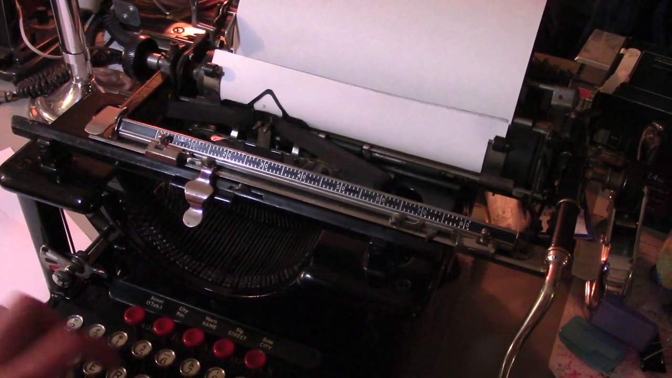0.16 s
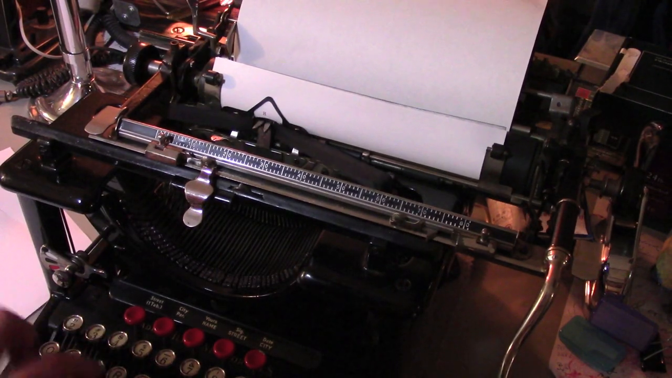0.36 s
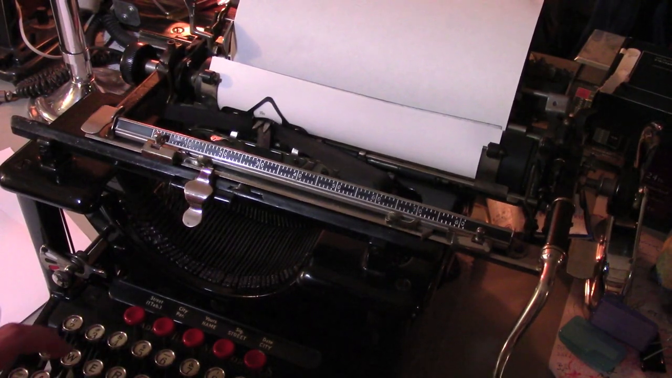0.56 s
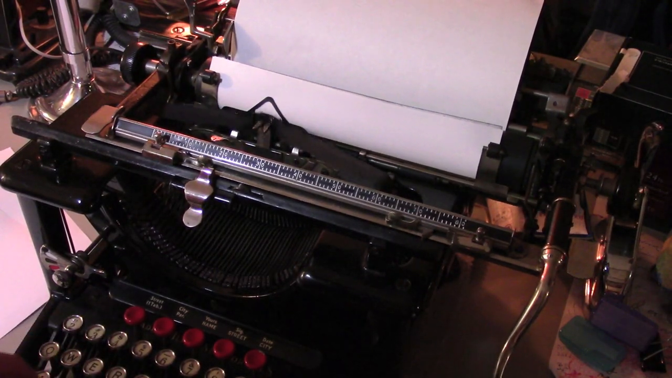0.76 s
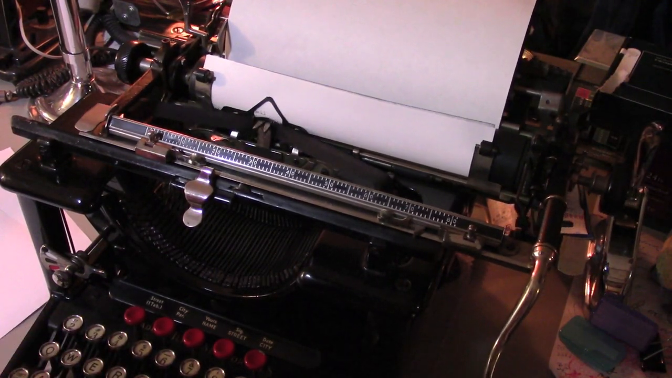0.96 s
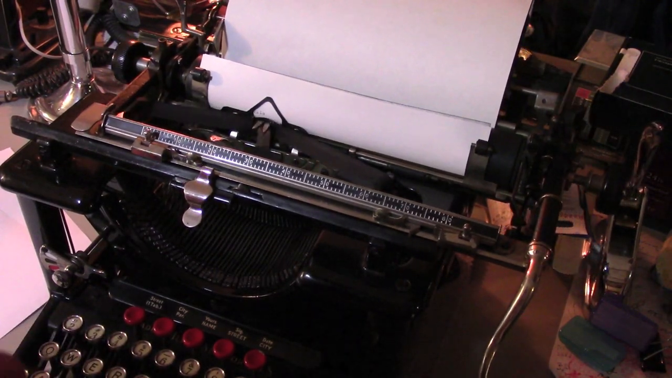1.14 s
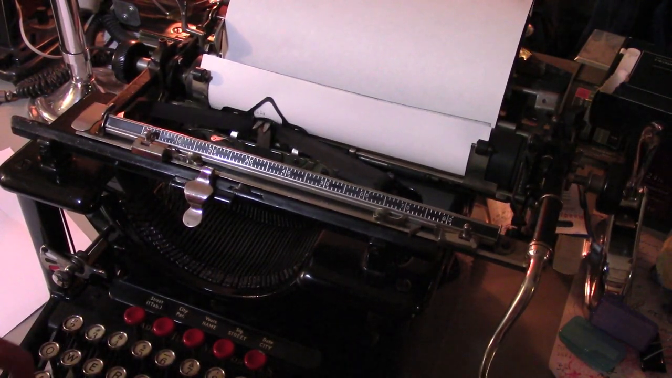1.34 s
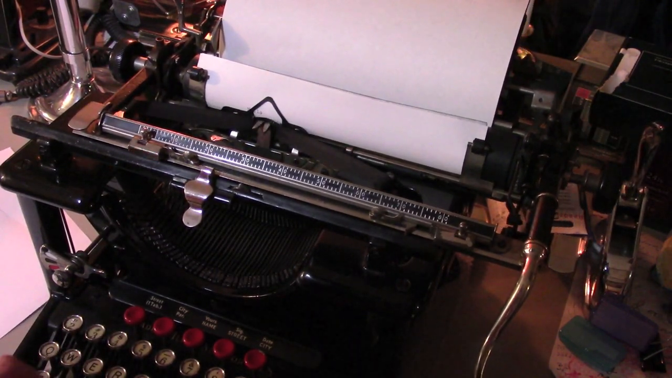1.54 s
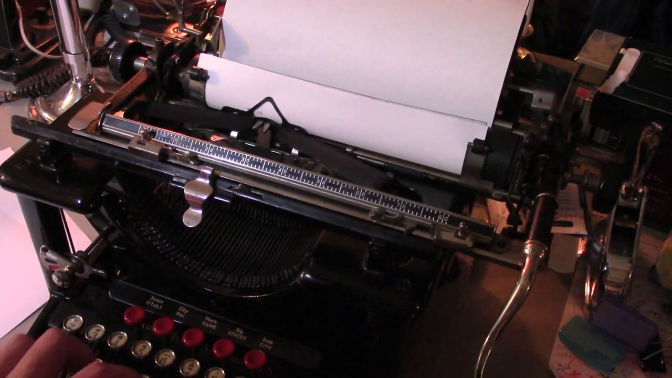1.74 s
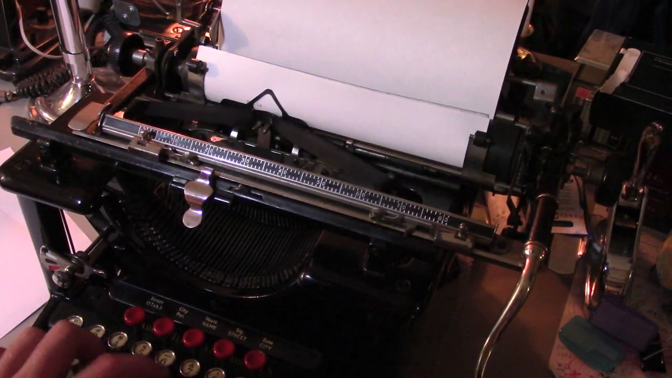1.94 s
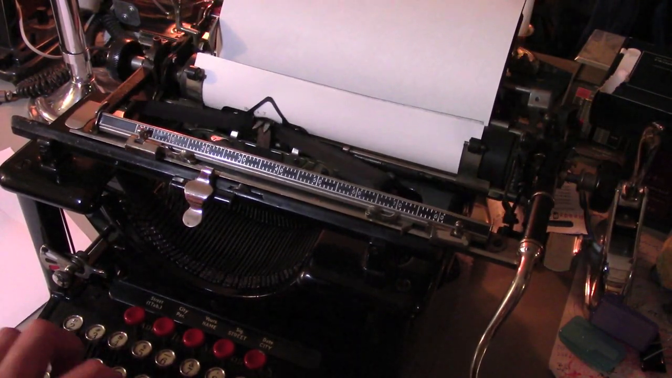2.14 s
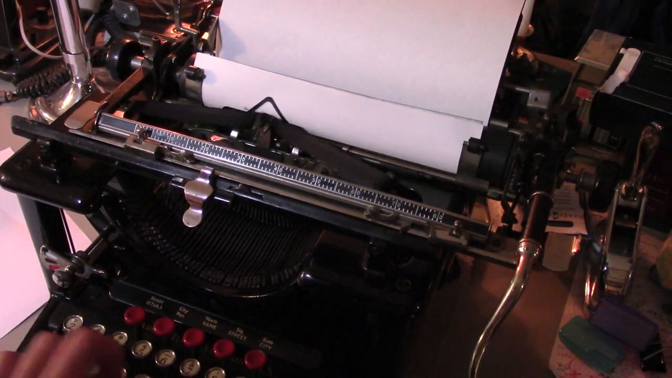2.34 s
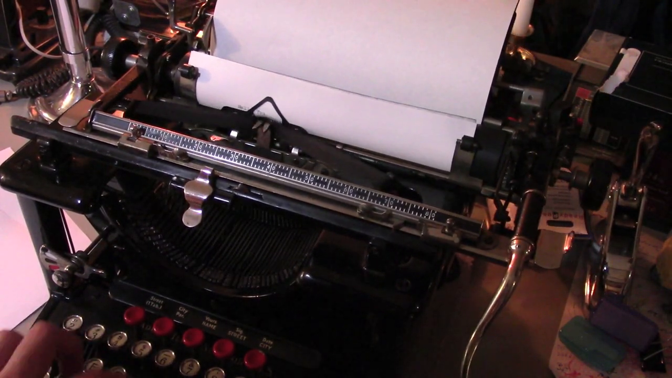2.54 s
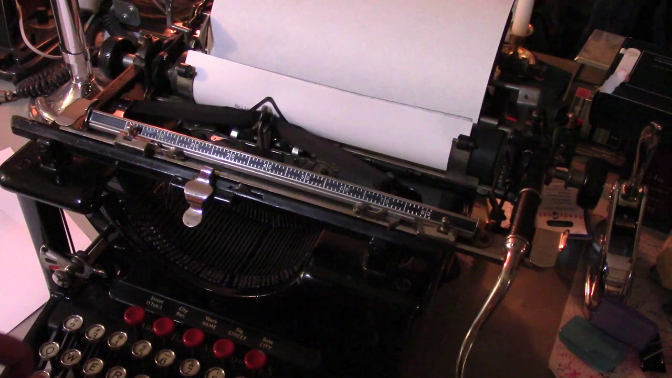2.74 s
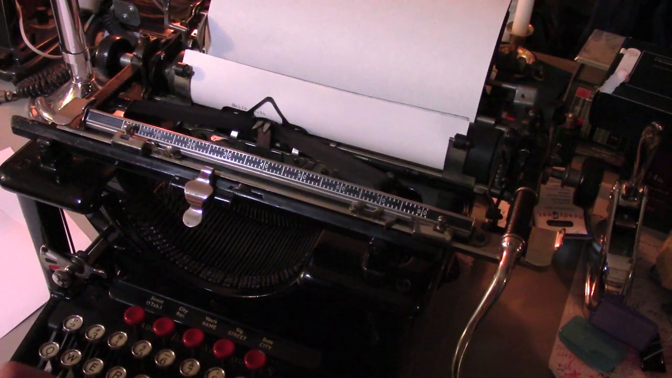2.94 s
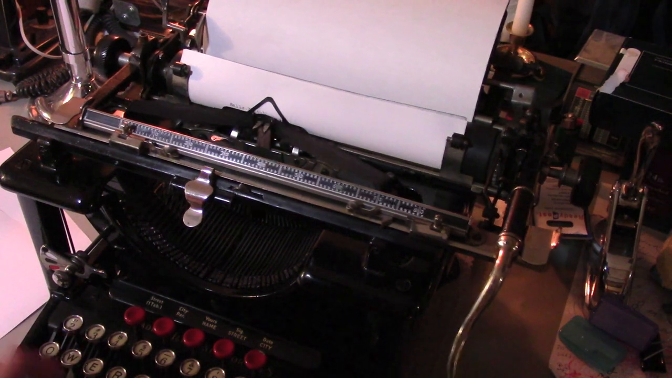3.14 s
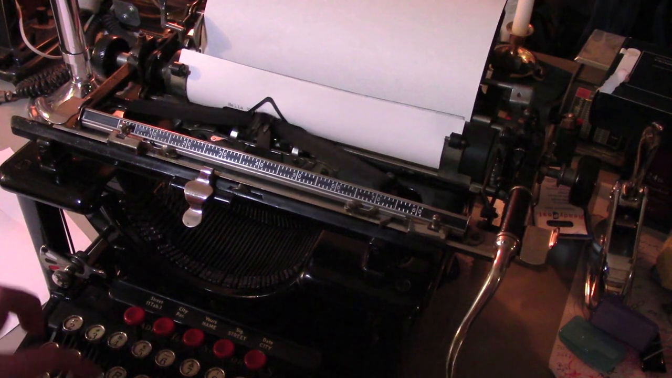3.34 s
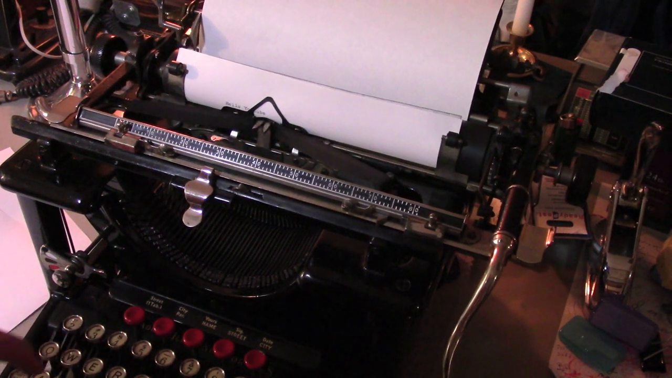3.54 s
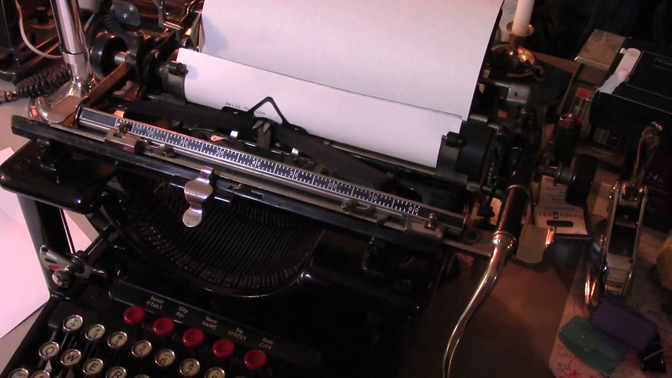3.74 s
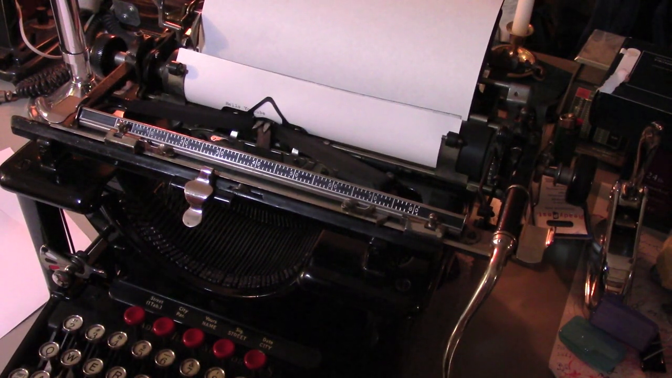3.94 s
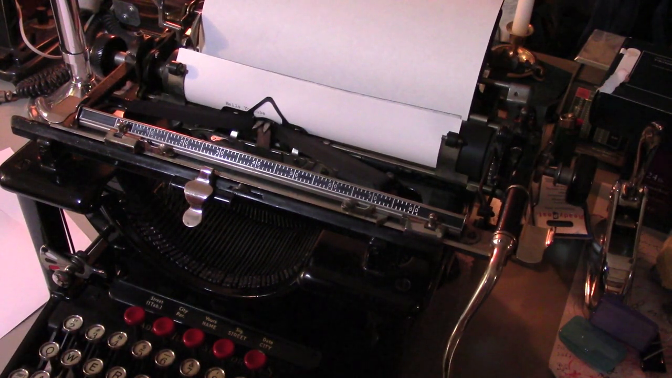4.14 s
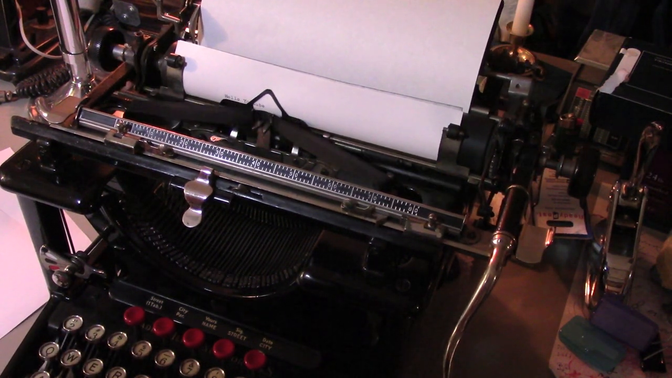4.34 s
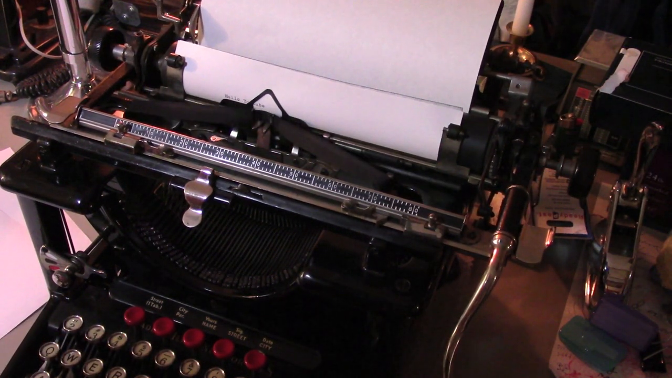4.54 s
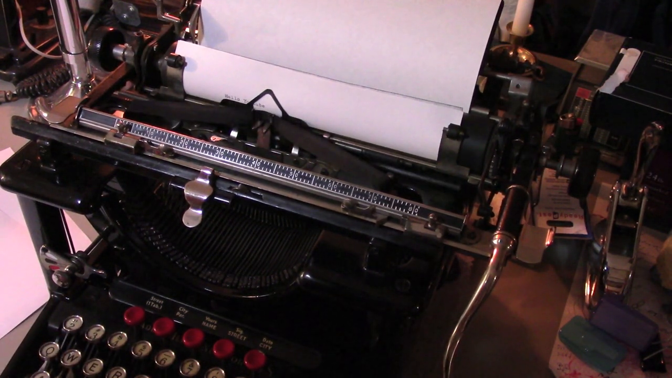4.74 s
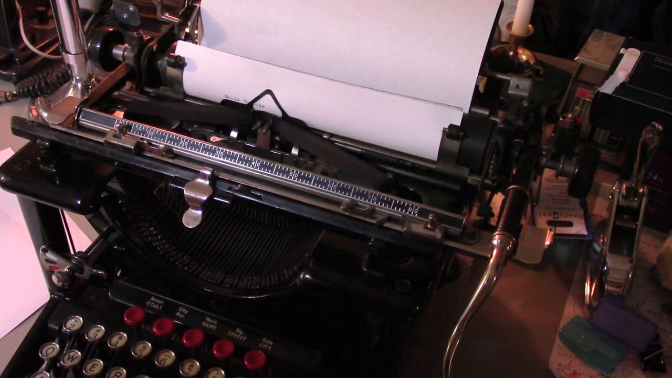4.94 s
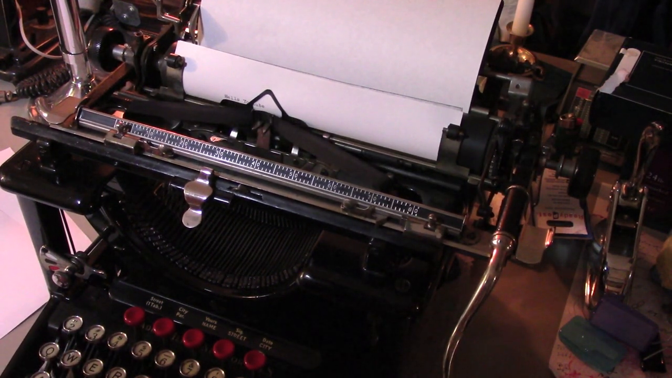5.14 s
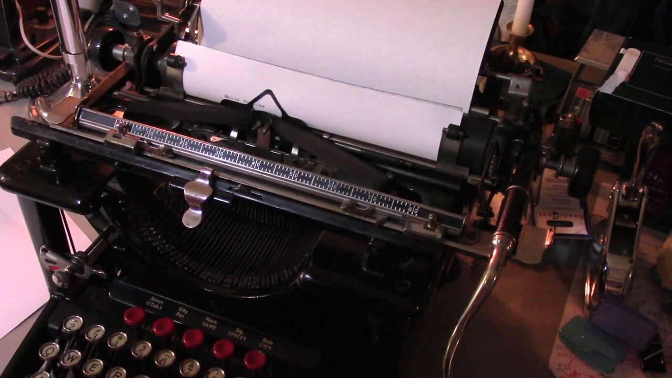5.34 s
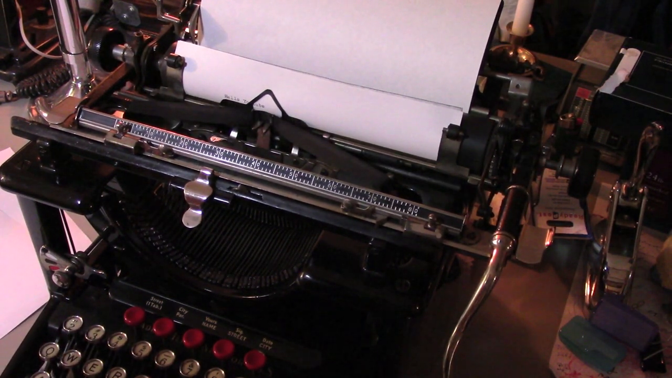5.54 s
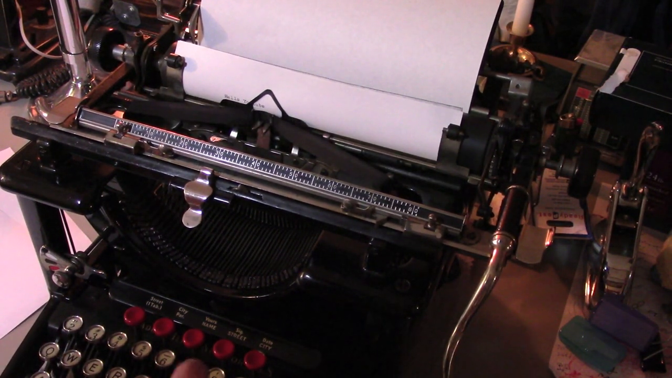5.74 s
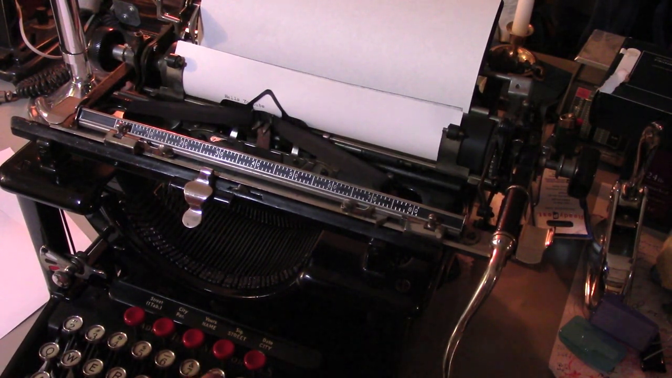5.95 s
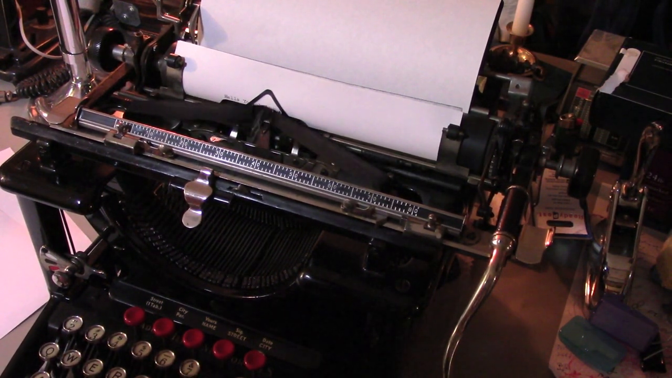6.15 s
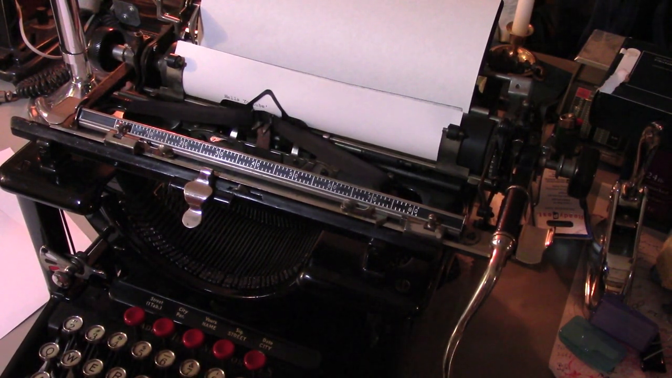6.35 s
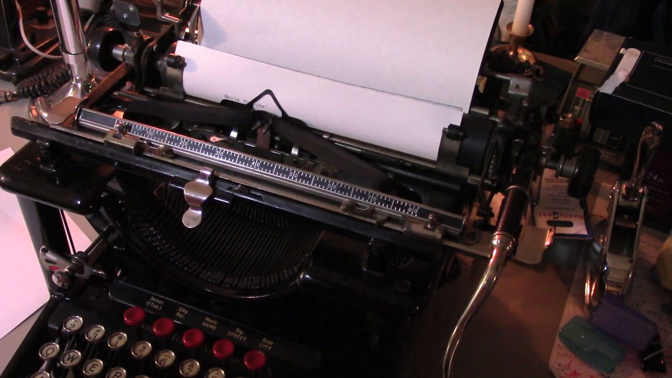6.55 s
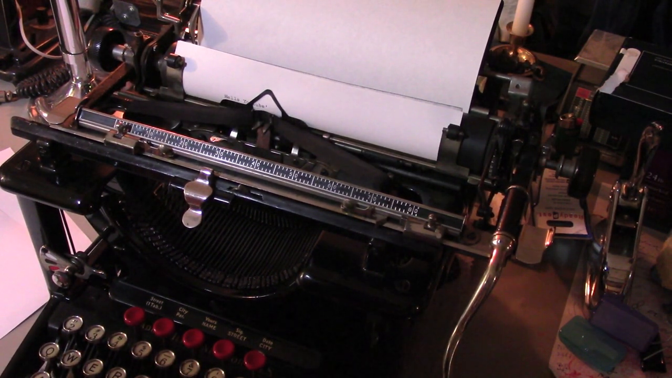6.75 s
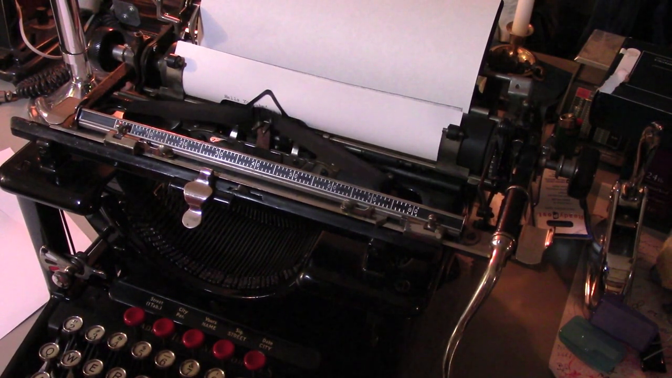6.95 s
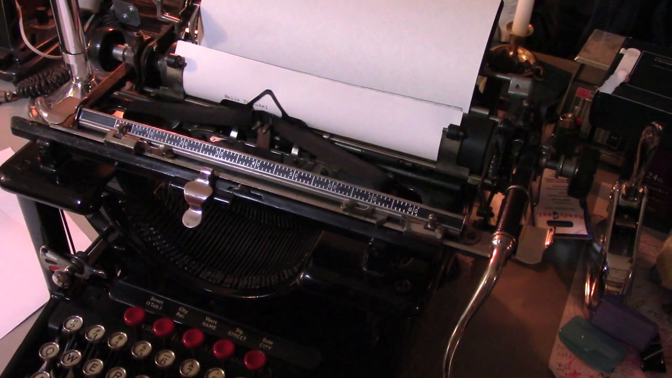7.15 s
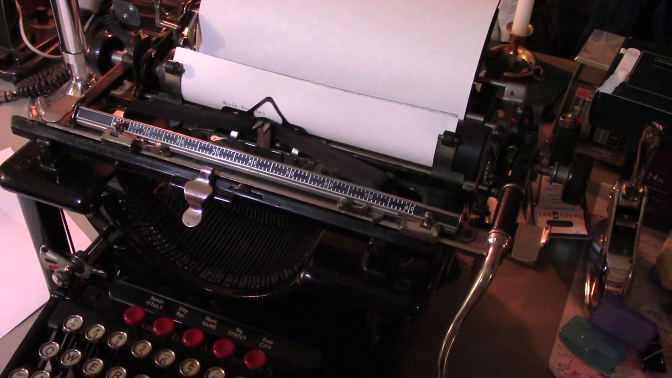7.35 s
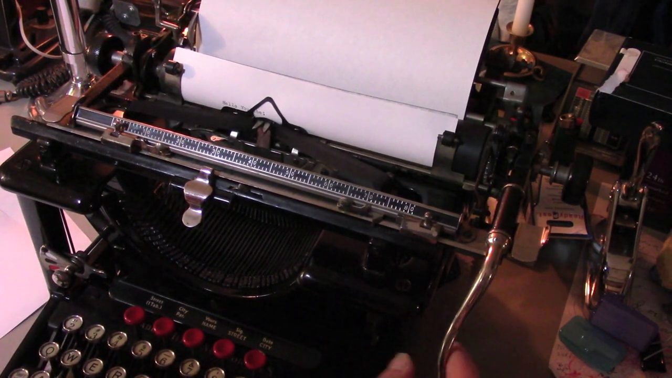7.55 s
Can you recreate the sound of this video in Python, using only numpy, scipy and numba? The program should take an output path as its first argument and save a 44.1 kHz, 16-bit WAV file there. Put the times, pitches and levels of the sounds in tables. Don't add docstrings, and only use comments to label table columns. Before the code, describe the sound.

Close by, a heavy manual typewriter is typed on in a quiet furnished room. Sharp, bright strikes on the platen come in uneven runs for about three and a half seconds, each followed by small clattering key and carriage clicks. Duller space-bar or shift thuds shake the wooden desk. A long pause follows, broken by a heavy thud, then two lone strikes and a final thud over low room rumble and faint hiss.

```python
import sys
import numpy as np
from scipy import signal
from scipy.fft import rfft, irfft
from scipy.io import wavfile
from scipy.ndimage import uniform_filter1d
from numba import njit

SR = 44100
rng = np.random.default_rng(int(sys.argv[2]) if len(sys.argv) > 2 else 0)


def inscribe(sig):
    pcm = np.round(np.clip(np.atleast_2d(sig).T, -1, 1) * 32767)
    wavfile.write(sys.argv[1], SR, pcm.astype(np.int16))


def to_linear_factor(level_db):
    exponent = np.asarray(level_db, float) / 20
    return 10 ** exponent


N = 334719
SPAN = 14000

# pitch_hz, level_db (per Hz)
AIR_SPECTRUM = [(15, -1.5), (124, -14.5), (162, -21), (205, -12), (480, -20), (740, -27), (1650, -38.5),
                (14100, -50.5)]
AIR_DB, AIR_LOW_HZ = -49.5, 11
MURMUR_HZ, MURMUR_WIDTH_HZ, MURMUR_DB = 1228, 130, 5.5

# pitch_hz, width_hz, level_db
STRIKE_BARS = [(2270, 87, 2), (2430, 210, -6.5), (2913, 100, 4.5), (3230, 56, -10.5), (3812, 240, -2),
               (4130, 40, -9), (4940, 37, -10.5), (4948, 42, -5), (5665, 60, -4.5), (6045, 51, -4.5),
               (6646, 200, -1)]
THUD_BARS = [(1810, 210, -7), (2280, 63, -9.5), (2900, 380, 4), (3150, 77, 0.5), (3800, 150, -1.5),
             (4193, 71, -33), (4584, 45, -4.5), (4640, 31, 2.5), (5800, 110, -13.5)]
LINK_BARS = [(1666, 93, 3.5), (2500, 380, -1.5), (3030, 70, 8), (3350, 130, 6.5), (4910, 48, -7),
             (5580, 38, -22.5), (6200, 32, -18), (7000, 96, -18.5)]
FRAME_MODES = [(287, 24, -2), (348, 6.3, -17.5), (421, 28, -1), (509, 50, 5.5), (704.5, 92, -6.5),
               (948, 77, -7.5), (1159, 270, -1.5), (1310, 37, -16)]
DESK_MODES = [(39.4, 22, -10), (72, 5.5, -11), (102, 5.2, -7.5), (121, 6.7, 9), (163.8, 17, 3),
              (211, 69, 4)]

# lever_start_s, lever_db, ribbon_lead_ms (before the strike), ribbon_db
PRESSES = [(0.0055, -31.5, 8.5, -18.5), (0.3802, -27.5, 9.6, -22.5), (0.7383, -30.5, 11.2, -21),
           (0.8418, -28.5, 10.9, -23.5), (1.007, -33.5, 8.6, -18.5), (1.9953, -27, 9.5, -23),
           (2.275, -29.5, 11.1, -24), (2.3754, -26, 11.5, -22), (2.5432, -28.5, 10.1, -24),
           (2.7061, -29, 9.7, -22), (3.058, -28, 9.2, -24), (3.28, -26, 8.2, -22.5), (6.0628, -35, 12, -27),
           (6.9337, -36.5, 8.3, -25)]
# start_s, ring_db, frame_db (re ring), slap_pitch_hz, rattle_t60_s
STRIKES = [(0.0481, -8.5, -20, 3970, 0.21), (0.4194, -10.5, -18, 4200, 0.17),
           (0.7845, -10, -15, 3800, 0.16), (0.8894, -9, -17.5, 3800, 0.14), (1.049, -6.5, -19, 3670, 0.15),
           (2.0356, -7.5, -19.5, 3860, 0.17), (2.3193, -9, -18, 3230, 0.15),
           (2.4181, -9.5, -16, 4030, 0.23), (2.5838, -8.5, -21, 3520, 0.15),
           (2.7465, -8.5, -19, 3800, 0.18), (3.098, -7, -21.5, 4270, 0.18), (3.3142, -6.5, -23, 3870, 0.17),
           (6.118, -9.5, -21.5, 3140, 0.16), (6.9745, -7, -21.5, 3360, 0.15)]
STRIKE_FIZZ_DB = -13
# delay_ms, level_db
SLUG_BOUNCES = [(1.9, -1), (3.5, -5), (5.6, -11)]
# bar_lands_s, release_db, pawl_db, carriage_step_db, landing_db (-90: the carriage stays)
RETURNS = [(0.168, -33, -30, -30.5, -23.5), (0.5329, -30, -37.5, -28, -29),
           (0.9719, -36.5, -27, -32.5, -27), (1.1595, -30.5, -30, -32.5, -26),
           (1.458, -42, -33, -29, -33.5), (2.165, -32.5, -30.5, -29, -21.5),
           (2.5197, -30, -33, -26.5, -45.5), (2.6928, -29, -33, -28.5, -24),
           (2.8508, -37.5, -31.5, -28.5, -27.5), (3.207, -33, -31, -31, -24.5),
           (3.429, -31.5, -31, -32, -26), (6.234, -35.5, -90, -90, -23.5), (7.0991, -35, -93, -87, -27)]
RELEASE_LEAD_S, PAWL_LEAD_S, STEP_LEAD_S = .0435, .033, .021
# start_s, ring_db, frame_db (re ring), rattle_t60_s
SLACK = [(0.118, -38.5, -11, 0.065), (0.541, -27.5, -5.5, 0.025), (0.8296, -29, -1.3, 0.22),
         (1.3434, -47, 10, 0.11), (1.3527, -41, -7, 0.29), (2.3917, -30, -6, 0.25),
         (4.8382, -32.5, 1.5, 0.042), (4.8631, -40, -21.5, 0.16), (6.2274, -38, 5, .08),
         (7.0911, -45.5, 2, .08), (7.244, -43.5, 7.5, 0.11), (7.2575, -31, 2, 0.19)]
SLACK_FIZZ_DB, SLACK_RISE_MS = -9, 6.9
# start_s, ring_db, frame_db (re ring)
TICKS = [(0.333, -55, 8), (0.602, -46, -8), (2.2191, -51, -8.5), (2.2487, -39, -3), (2.9263, -49.5, 5),
         (3.4938, -50, -13), (4.401, -61.5, 6), (4.8106, -59.5, -9), (5.2861, -55.5, -3), (5.4286, -60, -1),
         (5.5643, -55.5, -25), (5.944, -66, -3), (6.296, -51.5, -5), (7.2178, -55, 3), (7.2316, -52.5, 1.1),
         (7.3583, -51, 1.5)]
TICK_FIZZ_DB, TICK_RISE_MS, TICK_T60_S = -7, 1.8, 0.12
# frame_db (re ring), fizz_db (re ring), rise_ms, rattle_t60_s
LEVER, RIBBON = (-7, -8.5, 5.5, 0.06), (-11, -4, 4, 0.0664)
RELEASE, PAWL = (-5, -13, 3.5, 0.08), (-1.5, -12.5, 0.5, 0.2146)
STEP, LANDING = (-2.5, -10.5, -0.3, 0.2223), (-5.5, -6, 2.5, 0.1385)
# start_s, ring_db, fizz_db (re ring), rise_ms, rattle_t60_s
THUDS = [
    (0.2326, -19, -8.5, 6.8, 0.13),
    (1.9199, -16.5, -14, 3.5, 0.07),
    (1.936, -29.5, -9, 3.8, 0.14),
    (2.1472, -18.5, -12.5, 0.7, 0.095),
    (4.2651, -19.5, -14.5, 2.7, 0.12),
    (4.8444, -27, -5.5, 1.7, 0.1),
    (7.2635, -16.5, -13, 6.1, 0.063),
    (7.283, -28, -5, 1.3, 0.11),
]
THUD_FRAME_DB = -4.5
# start_s, ring_db, frame_db (re ring), fizz_db (re ring), rise_ms, rattle_t60_s
SHIFT = [
    (1.358, -21, -3.5, -7, 0.33, 0.11),
]
CLUMP_DB, CLUMP_SAMPLES = 2, 50

ROOM_T60_S, ROOM_DB, ROOM_TOP_HZ = 0.2, -26, 4000
# start_s, peak_db, pitch_hz
THUMPS = [(0.228, -19.5, 121), (0.417, -30, 103), (0.836, -31, 45.8), (1.918, -20.5, 131.8),
          (2.149, -19, 119.7), (2.388, -29, 104.6), (4.265, -22, 129), (4.847, -30, 108),
          (7.09, -49, 126.5), (7.262, -17, 117.8)]
THUMP_T60_S = .14
STEP_THUMP_DB, STEP_THUMP_HZ, STEP_THUMP_LEAD_S = 0.3, 108, 0.028
# start_s, pitch_hz, peak_db, t60_s
KNOCKS = [(.234, 348, -20.5, 0.079), (.234, 1310, -18.5, 0.091), (.24, 72, -33.5, 0.99),
          (1.357, 292, -19, 0.088), (1.919, 515, -21, 0.1), (1.919, 1177, -13.5, 0.04),
          (2.149, 492, -30, 0.29), (2.149, 1072, -14.5, 0.033), (2.16, 72, -31.5, 0.66),
          (4.265, 497, -23.5, 0.15), (4.266, 1100, -12.5, 0.038), (4.846, 356, -25, 0.075),
          (7.264, 508.5, -22.5, 0.19), (7.264, 1273, -27, .11), (7.27, 72, -36.5, 0.94),
          (7.42, 150.2, -36.5, 0.21), (4.846, 220, -35, 0.19), (7.264, 217.2, -31, 0.28),
          (1.44, 224.2, -24.5, 0.08), (.236, 223, -24, 0.13), (2.15, 219.4, -23.5, 0.18),
          (4.267, 228, -29, 0.17), (1.367, 483, -21, 0.11), (7.266, 337.6, -29, 0.17)]
# start_s, pitch_hz, peak_db, t60_s
RINGS = [(.972, 7400, -33, .07), (2.93, 5800, -58, .2), (2.93, 2750, -57, .25), (4.275, 2060, -36, .23),
         (4.811, 5600, -57, .08), (4.866, 5470, -38, .05), (4.867, 3800, -38, .06), (6.064, 3200, -46, .09),
         (6.12, 5900, -30, .12), (6.237, 5000, -35, .1), (6.24, 9400, -35, .045), (6.296, 3300, -54, .07)]
# start_s, pitch_hz, level_db (rms), t60_s
SINGING = [(.42, 8538, -63, 1.2), (.6, 8538, -72, 0.86), (1.01, 12468, -54, .4), (1.16, 8600, -69, .7),
           (1.162, 12468, -43, 0.26), (2.75, 8538, -80, .8), (3.455, 8538, -70.5, 1.4),
           (3.429, 3360, -77, 2.2)]
BEAT_HZ, BEAT_DEPTH = 12, .75
# start_s, peak_db, ring_pitch_hz
CLICKS = [(1.3578, -9, 4800), (1.3587, -10, 3600), (1.9233, -11, 4700), (2.1482, -15, 4700),
          (4.204, -51, 2000), (4.212, -52, 2500), (4.2285, -41, 1000), (4.229, -46, 2100),
          (4.2435, -48, 2200), (4.2693, -12, 4800), (4.8112, -44, 5600), (4.8455, -20, 3800),
          (5.5655, -37, 8800), (5.5657, -38, 4200), (7.2655, -10, 2700)]
CLICK_WIDTH_HZ, CLICK_RING_DB = 500, 4
# time_s, level_db (rms)
RUSTLE = [(1.5, -93), (1.6, -71), (1.721, -66), (1.8, -73.5), (1.87, -59.5), (1.93, -66.5), (2., -90)]
# time_s, pitch_hz, level_db (rms)
WHINE = [
    [(5.82, 9600, -98), (5.85, 10100, -79.5), (5.885, 10900, -82), (5.95, 12000, -98)],
    [(6.29, 12500, -88), (6.33, 12000, -79), (6.37, 10900, -79), (6.41, 10500, -80), (6.45, 9800, -83.5),
     (6.51, 8600, -92)],
]
TOP_HZ = 15800


def band(x, lo_hz, hi_hz):
    return signal.sosfilt(signal.butter(3, [lo_hz, hi_hz], "bandpass", fs=SR, output="sos"), x)


def peak_level(x, db, count):
    return x * to_linear_factor(db) / np.sqrt(uniform_filter1d(x ** 2, count).max())


@njit
def ring(push, pole, gain):
    out = np.zeros(len(push))
    for k in range(len(pole)):
        z = 0j
        for i in range(len(push)):
            z = z * pole[k] + push[i]
            out[i] += gain[k] * z.imag
    return out


def body(push, modes, chance, scatter_db, detune):
    hz, width, db = np.transpose(modes)
    hz = hz * (1 + detune * chance[0, :len(hz)])
    pole = np.exp((2j * np.pi * hz - np.pi * width) / SR)
    return ring(push + 1e-18, pole, to_linear_factor(db + scatter_db * chance[1, :len(hz)]) * width)


def flutter(rate_hz, depth_db):
    k = int(SR / rate_hz)
    steps = np.repeat(rng.standard_normal(N // k + 1), k)
    return to_linear_factor(depth_db * uniform_filter1d(steps, k)[:N])


def air():
    hz, db = np.transpose(AIR_SPECTRUM)
    f = np.maximum(np.arange(N // 2 + 1) * SR / N, 1)
    murmur = MURMUR_DB / (1 + ((f - MURMUR_HZ) / MURMUR_WIDTH_HZ) ** 4)
    colour = rfft(rng.standard_normal(N)) * to_linear_factor(np.interp(np.log(f), np.log(hz), db) + murmur)
    colour = colour / (1 + (AIR_LOW_HZ / f) ** 6)
    low = 1 / (1 + (f / 900) ** 2)
    noise = irfft(colour * low, N) * flutter(6, 0.55) + irfft(colour * (1 - low), N)
    return noise * to_linear_factor(AIR_DB) / np.sqrt(np.mean(noise ** 2))


def links():
    rows = []
    for (s, lever_db, lead_ms, ribbon_db), strike in zip(PRESSES, STRIKES):
        rows += [(s, lever_db, *LEVER), (strike[0] - lead_ms / 1000, ribbon_db, *RIBBON)]
    for s, release_db, pawl_db, step_db, land_db in RETURNS:
        rows += [(s - RELEASE_LEAD_S, release_db, *RELEASE), (s - PAWL_LEAD_S, pawl_db, *PAWL),
                 (s - STEP_LEAD_S, step_db, *STEP), (s, land_db, *LANDING)]
    rows += [(s, db, frame_db, SLACK_FIZZ_DB, SLACK_RISE_MS, t60) for s, db, frame_db, t60 in SLACK]
    return rows + [(s, db, frame_db, TICK_FIZZ_DB, TICK_RISE_MS, TICK_T60_S) for s, db, frame_db in TICKS]


def slug_slap(blow, pitch_hz, chance):
    slap = blow.copy()
    for (ms, db), c in zip(SLUG_BOUNCES, chance[0, 8:]):
        delay = int(ms * (1 + .12 * c) * SR / 1000)
        slap += to_linear_factor(db + 2.5 * c) * np.sign(c) * np.roll(blow, delay)
    modes = [(pitch_hz, 800, 0), (pitch_hz, 110, -9), (1.55 * pitch_hz, 1100, -4)]
    return body(slap, modes, chance, 0, 0)


def small_parts(chatter, blow, chance):
    modes = [(hz, 220, (8000 - hz) / 600) for hz in (8000, 9500, 11500, 13000)]
    notes = peak_level(body(chatter + blow, modes, chance, 5.0, .06), -8, count=88)
    hiss = signal.lfilter([1], [1, -1.36, .46], band(chatter + blow / 4, 6600, 16000))
    return notes + peak_level(hiss, 0, count=88)


def frame_and_desk(shove, chance, desk_db):
    frame = peak_level(body(shove, FRAME_MODES, chance[2], 3.0, .015), 0, count=350)
    frame = frame + peak_level(band(shove, 180, 1100), -4, count=350)
    desk = peak_level(body(shove, DESK_MODES, chance[3], 4.7, 0.042), desk_db, count=1100)
    return peak_level(frame, 0, count=350) + desk


def contacts(table, bars, blow_db, grain_db, desk_db, frame_lag_ms, frame_slow, snap_db, slap_db=None):
    out, t = np.zeros(N + SPAN), np.arange(SPAN) / SR
    for s, ring_db, frame_db, fizz_db, shape, t60 in table:
        grains = rng.standard_normal((3, SPAN))
        grains = grains * to_linear_factor(grain_db * np.minimum(rng.exponential(size=SPAN), 3))
        clumps = np.repeat(rng.standard_normal(400), CLUMP_SAMPLES)
        grains = grains * to_linear_factor(CLUMP_DB * np.resize(clumps, SPAN))
        chance = rng.standard_normal((4, 2, 16))
        rise = (max(shape, .1) if slap_db is None else .3) / 1000
        age = np.maximum(t - rise, 0)
        fade = to_linear_factor(-60 * age / max(t60, .01))
        snap = 1 + to_linear_factor(snap_db) * to_linear_factor(-60 * age / 0.039)
        rattle, chatter = grains[::2] * np.minimum(t / rise, 1) ** 0.32 * fade * snap
        blow = np.zeros(SPAN)
        blow[int(rise * SR / 2)] = to_linear_factor(blow_db)
        steel = peak_level(body(rattle + blow, bars, chance[0], 3.5, .015), 0, count=88)
        steel = steel + peak_level(band(rattle, 1600, 5380), 5, count=88)
        if slap_db is not None:
            steel = steel + peak_level(slug_slap(blow, shape, chance[1]), slap_db, count=88)
        fizz = small_parts(chatter, blow, chance[1])
        shove = grains[1] * np.minimum(t / (rise + frame_lag_ms / 1000), 1) * fade ** frame_slow
        hit = peak_level(steel, 0, count=88) + peak_level(fizz, fizz_db, count=88)
        hit = hit + to_linear_factor(frame_db) * frame_and_desk(shove, chance, desk_db)
        i = int(s * SR)
        out[i:i + SPAN] += to_linear_factor(ring_db) * hit
    return out[:N]


def room(x):
    t = np.arange(SR) / SR
    tail = band(rng.standard_normal(SR), 35, ROOM_TOP_HZ) * to_linear_factor(-60 * t / ROOM_T60_S) * (t > .006)
    return to_linear_factor(ROOM_DB) * signal.fftconvolve(x, tail / np.sqrt(np.sum(tail ** 2)))[:N]


def thumps():
    steps = [(row[0] - STEP_THUMP_LEAD_S, row[3] + STEP_THUMP_DB, STEP_THUMP_HZ) for row in RETURNS]
    return knocks([(s, hz, db + .8, THUMP_T60_S) for s, db, hz in THUMPS + steps], rise_cycles=0.97)


def knocks(table, rise_cycles, rough_db=2.8):
    t, out = np.arange(N) / SR, np.zeros(N)
    for s, hz, db, t60 in table:
        age = np.maximum(t - s, 0)
        envelope = to_linear_factor(db - 60 * age / t60) * (1 - np.exp(-age * hz / rise_cycles))
        out += envelope * np.sin(2 * np.pi * hz * age) * flutter(hz / 4, rough_db)
    return out


def singing():
    t, out = np.arange(N) / SR, np.zeros(N)
    for s, hz, db, t60 in SINGING:
        age = np.maximum(t - s, 0)
        tone = np.sqrt(2) * to_linear_factor(db - 60 * age / t60) * np.sin(2 * np.pi * hz * age)
        beat = 1 + BEAT_DEPTH * (8000 < hz < 9000) * np.cos(2 * np.pi * BEAT_HZ * age)
        out += tone * flutter(12, 2.5) * beat
    return out


def clicks():
    out, tick = np.zeros(N + SPAN), np.zeros(SPAN)
    tick[0] = 1
    for s, db, hz in CLICKS:
        rung = body(tick, [(hz, CLICK_WIDTH_HZ, 0)], np.zeros((2, 1)), 0, 0)
        dry_tick = band(tick, hz / 3, min(hz * 3, 13000))
        both = dry_tick / np.abs(dry_tick).max() + to_linear_factor(CLICK_RING_DB) * rung / np.abs(rung).max()
        i = int(s * SR)
        out[i:i + SPAN] += to_linear_factor(db) * both / np.abs(both).max()
    return out[:N]


def rustle():
    s, db = np.transpose(RUSTLE)
    patchy = uniform_filter1d(np.repeat(rng.standard_normal(N // 900 + 1), 900), 600)[:N]
    cloth = band(rng.standard_normal(N), 600, 3600) * to_linear_factor(3.0 * patchy)
    return cloth / np.std(cloth) * to_linear_factor(np.interp(np.arange(N) / SR, s, db, -120, -120))


def lens():
    t, out = np.arange(N) / SR, np.zeros(N)
    for glide in WHINE:
        s, hz, db = np.transpose(glide)
        tone = np.sin(2 * np.pi * np.cumsum(np.interp(t, s, hz)) / SR)
        out += np.sqrt(2) * to_linear_factor(np.interp(t, s, db)) * tone * (t > s[0]) * (t < s[-1])
    return out


def scene():
    strikes = [(s, db, frame_db, STRIKE_FIZZ_DB, hz, t60) for s, db, frame_db, hz, t60 in STRIKES]
    thuds = [(s, db, THUD_FRAME_DB, *rest) for s, db, *rest in THUDS]
    machine = contacts(links(), LINK_BARS, blow_db=2.5, grain_db=3.0, desk_db=-18,
                       frame_lag_ms=2.1, frame_slow=0.99, snap_db=-2.5)
    machine += contacts(strikes, STRIKE_BARS, blow_db=28.5, grain_db=2.5, desk_db=-19.5,
                        frame_lag_ms=1.2, frame_slow=1.0, snap_db=7.0, slap_db=10.0)
    machine += contacts(thuds, THUD_BARS, blow_db=3.5, grain_db=3.5, desk_db=-8.5,
                        frame_lag_ms=12, frame_slow=1.0, snap_db=-12.0)
    machine += contacts(SHIFT, THUD_BARS, blow_db=2, grain_db=3.5, desk_db=-15,
                        frame_lag_ms=7.1, frame_slow=1.0, snap_db=-3)
    machine += thumps() + knocks(KNOCKS, rise_cycles=0.73)
    machine += knocks(RINGS, rise_cycles=2.98, rough_db=2.5) + clicks()
    return (machine + room(machine) + singing() + lens() + rustle() + air())[None]


def roll_off(x):
    return signal.sosfilt(signal.butter(12, 16970, fs=SR, output="sos"), x)


def record(dry):
    held = dry / (1 + (np.abs(dry) / .57) ** 4) ** (1 / 4)
    held = signal.sosfilt(signal.ellip(10, .3, 60, TOP_HZ, fs=SR, output="sos"), held)
    return roll_off(held)


dry = scene()
out = record(dry)
inscribe(out)
```